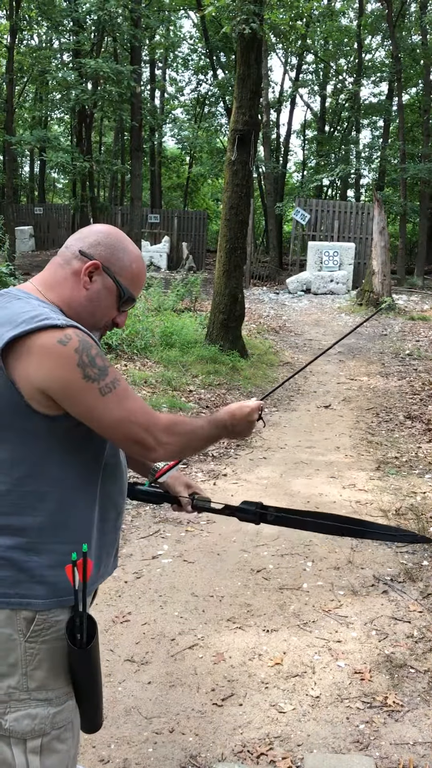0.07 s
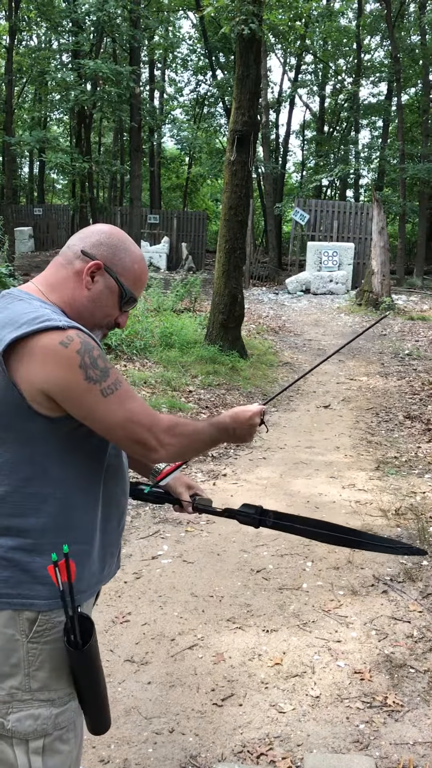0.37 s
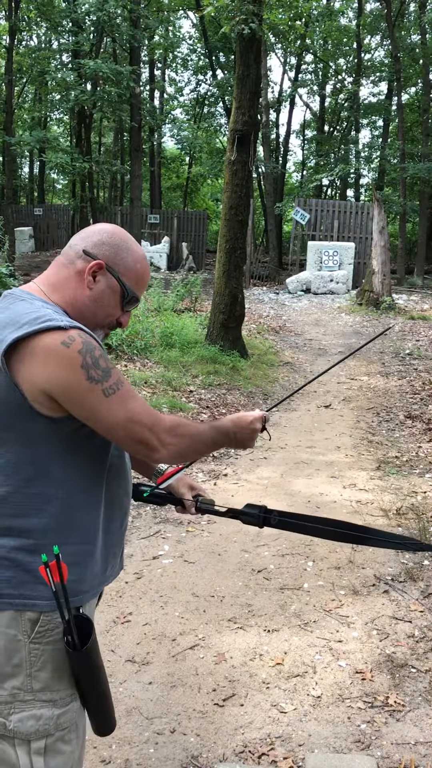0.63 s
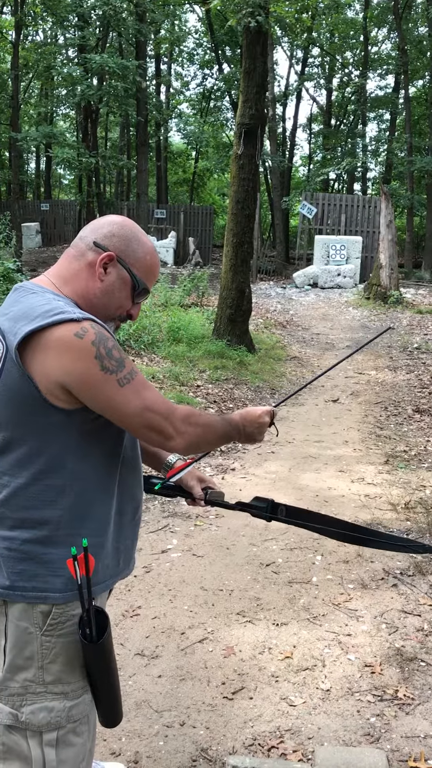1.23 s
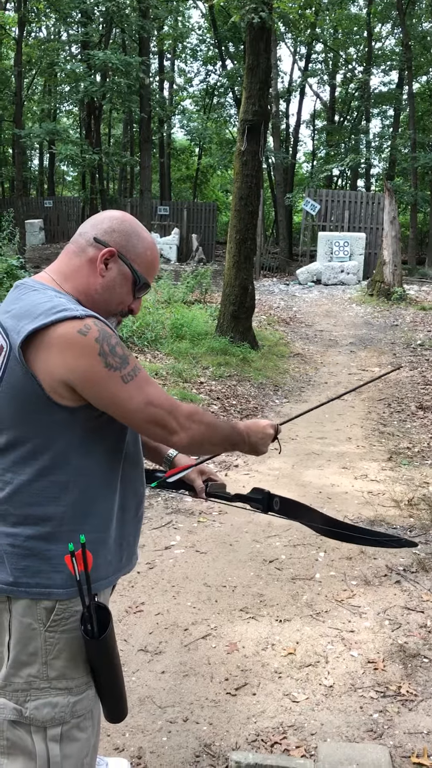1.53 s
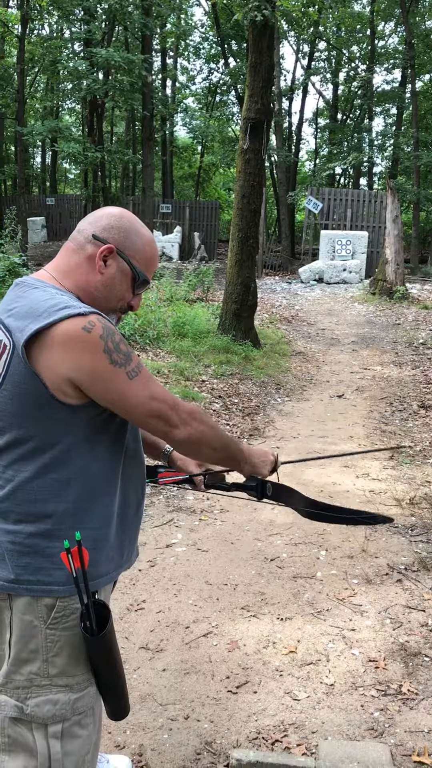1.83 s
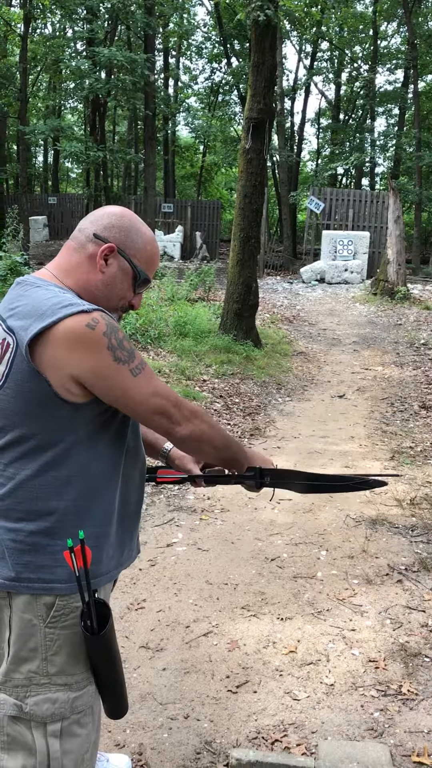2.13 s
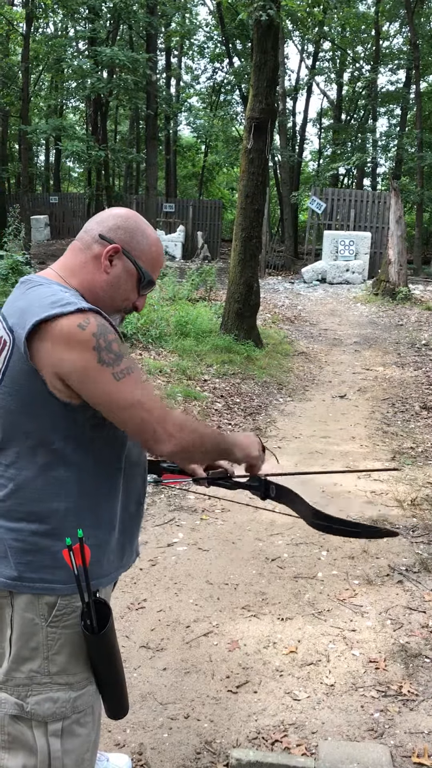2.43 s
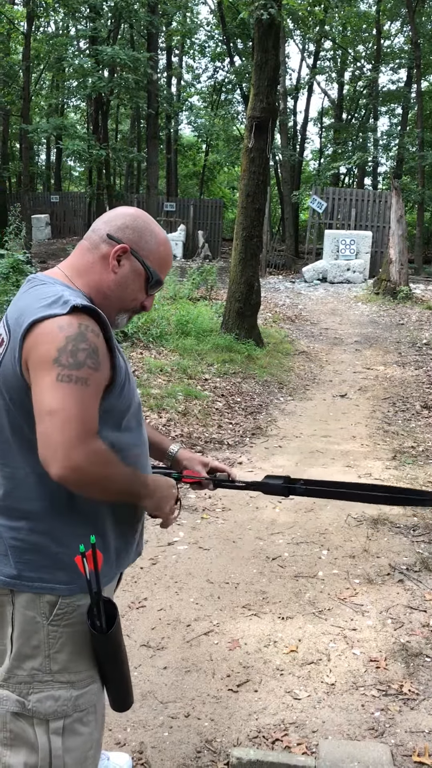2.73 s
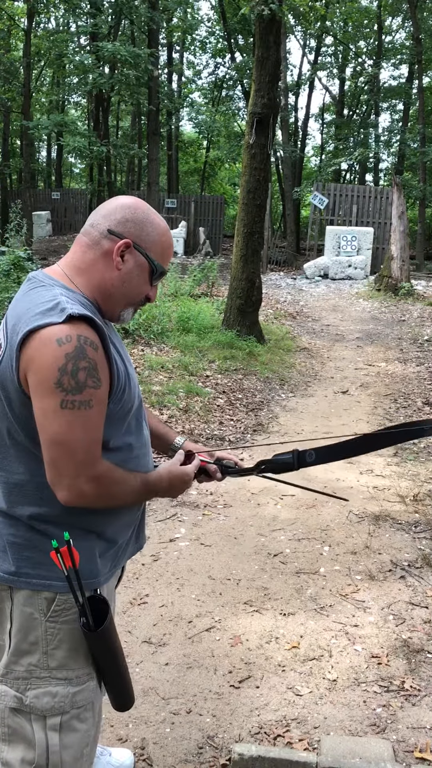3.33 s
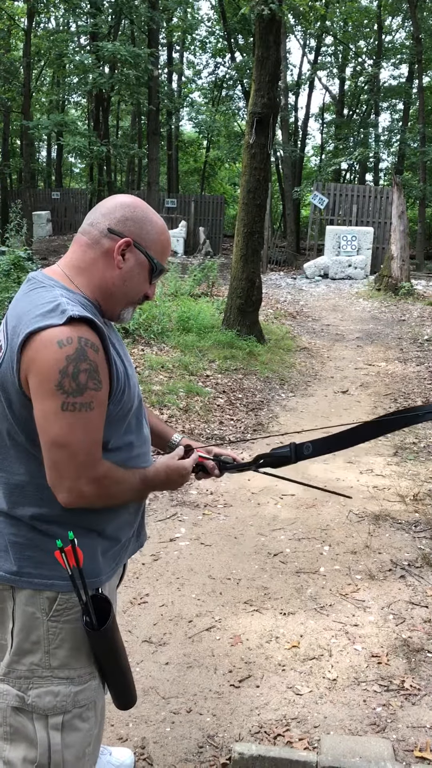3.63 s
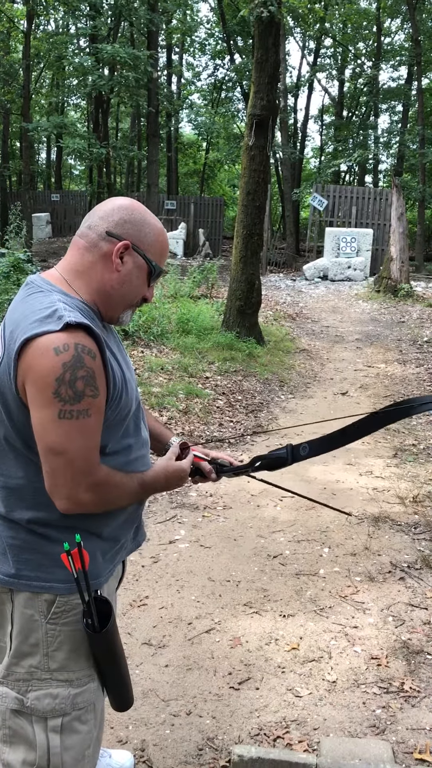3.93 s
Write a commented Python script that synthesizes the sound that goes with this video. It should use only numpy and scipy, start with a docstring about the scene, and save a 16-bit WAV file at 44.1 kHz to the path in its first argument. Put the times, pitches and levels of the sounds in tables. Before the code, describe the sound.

A close arrow shaft strikes a bow with one sharp, briefly ringing clack about halfway through, followed by small ticks and muffled bumps. Faint bird chips, insects and a low, far engine drone fill the quiet woods.

```python
"""An arrow is laid on a bow close to the microphone, in a wood: the shaft slides, clacks against
the rest, rings briefly and ticks along it. Farther off, small birds chip and the trunks echo them.
One nearby insect pulses its wings over a distant chorus and a cricket. Two far engines drone
and beat against each other, in a wash of traffic and leaves."""
import sys
import numpy as np
from scipy import signal
from scipy.fft import rfft, irfft
from scipy.io import wavfile

SR = 44100
rng = np.random.default_rng(int(sys.argv[2]) if len(sys.argv) > 2 else 0)


def put_to_file(sound):
    """Save the sound as 16-bit audio at rate SR, in the file named by the first command-line argument."""
    columns = np.atleast_2d(sound).T  # one column per channel
    safe = np.clip(columns, -1, 1)
    whole_steps = np.round(safe * 32767)
    wavfile.write(sys.argv[1], SR, whole_steps.astype(np.int16))


N = 176400
T = np.arange(N) / SR


def amp(db):
    """Decibels to gain."""
    return 10 ** (np.asarray(db) / 20)


def unit_rms(x):
    """Scales to rms 1."""
    return x / np.sqrt(np.mean(x ** 2) + 1e-20)


def curve(rows, column=1):
    """One column of a time table at every sample."""
    rows = np.array(rows)
    return np.interp(T, rows[:, 0], rows[:, column])


def add(mix, start, sound):
    """Mixes a sound in at a start in seconds."""
    part = mix[max(round(start * SR), 0):][:len(sound)]
    part += sound[:len(part)]


def noise(shape):
    """Noise of rms 1 whose spectrum is shape(Hz)."""
    hz = np.fft.rfftfreq(N, 1 / SR) + 1
    return unit_rms(irfft(rfft(rng.standard_normal(N)) * shape(hz), N))


def coloured(points):
    """Noise with a spectrum of (Hz, relative dB) points."""
    hz, db = np.transpose(points)
    return noise(lambda f: amp(np.interp(np.log(f), np.log(hz), db)))


def band(hz, width):
    """Noise in a bell around one frequency."""
    return noise(lambda f: np.exp(-.5 * ((f - hz) / width) ** 2))


# The far wash and its rumble. Each row: frequency in Hz, relative level in dB.
AIR_SPECTRUM = [(120, -38), (200, -6), (300, -2), (440, -8), (640, -4), (950, -2), (1400, -8),
                (2000, -14.5), (3000, -23.5), (4000, -29), (5300, -31.5), (6500, -36), (9000, -40),
                (11500, -44), (15700, -43.5)]
RUMBLE_SPECTRUM = [(15, -33), (28, -14), (38, -1), (55, 2.5), (70, 3), (110, -4), (135, -12), (190, -12.5),
                   (260, -38), (500, -58.5)]
# The wash's swell and a soft treble among the trees. Each row: time in seconds, gain in dB.
AIR_SWELL = [(0, -0.3), (1, -0.5), (1.8, 0.64), (2.8, 1), (3.3, -0.5), (4, -0.8)]
TREBLE_LEVEL = [(0, -71.5), (.6, -78), (.9, -70.5), (1.3, -73.5), (1.9, -71.5), (2.3, -66.5), (2.8, -68.5),
                (3.1, -71), (3.6, -74), (4, -86)]


def traffic_and_leaves():
    """Distant traffic and leaves blur into a slowly swelling wash."""
    air = amp(-51.5 + curve(AIR_SWELL)) * coloured(AIR_SPECTRUM)
    rumble = amp(-42) * coloured(RUMBLE_SPECTRUM)
    treble = amp(curve(TREBLE_LEVEL)) * band(3110, width=950)
    return air + rumble + treble


# The nearer engine. Each row: time in seconds, firing rate in Hz, level in dB.
NEARER_ENGINE = [(0, 74.16, -34), (1.0, 74.4, -37), (1.5, 74.92, -34.5), (1.9, 74.75, -36.5),
                 (2.4, 75.28, -31), (2.9, 77.38, -30), (3.25, 76.5, -36), (3.55, 77.4, -31),
                 (4, 78.94, -37.5)]
# The farther engine. Each row: time in seconds, level in dB.
FARTHER_ENGINE = [(0, -53), (.6, -40.5), (1.1, -35), (1.6, -38), (2.1, -56), (2.4, -85), (4, -47.5)]
# Harmonics of both. Each row: multiple of the firing rate, relative level in dB.
HARMONICS = [(1, 1), (2, -23), (3, -30)]


def engines(farther_hz=80.25, whine_hz=551.9, waver_db=0.98):
    """Two far drones a few hertz apart beat; a thin whine wavers above them."""
    def drone(cycles):
        return sum(amp(db) * np.sin(2 * np.pi * k * cycles) for k, db in HARMONICS)

    nearer_db = curve(NEARER_ENGINE, column=2) + waver_db * band(4, width=5)
    nearer = amp(nearer_db) * drone(np.cumsum(curve(NEARER_ENGINE)) / SR)
    farther = amp(curve(FARTHER_ENGINE)) * drone(farther_hz * T)
    whine = amp(-62) * np.sin(2 * np.pi * whine_hz * T) + amp(-65) * band(whine_hz, width=6.1)
    return nearer - farther + whine


# Insects deep in the wood. Each row: frequency in Hz, relative level in dB.
CHORUS_SPECTRUM = [(6000, -30), (6800, -11), (7100, 0), (7500, -1.5), (7900, 0), (8300, -0.5), (8600, -34),
                   (9500, -45)]
# Their steady trills. Each row: centre in Hz, width in Hz, level in dB.
TRILLS = [(7355, 27, -80.5), (10230, 84, -90)]
# A far cricket. Each row: time in seconds, pitch in Hz, level in dB.
CRICKET = [(0, 2550, -72), (.45, 2560, -73.5), (.7, 2567, -73.5), (1.7, 2580, -73), (2.05, 2626, -67.5),
           (2.7, 2614, -73), (3.2, 2647, -76), (4, 2670, -76)]


def far_insects():
    """Many insects merge into a hiss, with thin trills and a cricket's fluttering tone."""
    trills = sum(amp(db) * band(hz, width) for hz, width, db in TRILLS)
    tone = np.sin(2 * np.pi * np.cumsum(curve(CRICKET)) / SR)
    cricket = amp(curve(CRICKET, column=2)) * unit_rms(band(0, width=48) * tone)
    return trills + cricket + amp(-73.5) * coloured(CHORUS_SPECTRUM)


# One cycle of wing strokes. Each row: first peak in seconds, half-width in seconds, level in dB.
WING_STROKES = [(0.098, 0.0051, -66.5), (.124, 0.015, -73.5), (0.165, .011, -74.5)]
# The wing's resonances. Each row: centre in Hz, width in Hz, relative level in dB.
WING_BANDS = [(8077, 25, 2), (8070, 120, -4), (8380, 26, -8)]


def near_insect(cycles_per_s=8.56):
    """An insect near the microphone repeats one strong and two weak wing strokes."""
    period, strokes = 1 / cycles_per_s, np.zeros(N)
    for peak, half_width, db in WING_STROKES:
        from_peak = (T - peak + period / 2) % period - period / 2
        strokes += amp(db) * np.exp(-.5 * (from_peak / half_width) ** 2)
    wing = signal.hilbert(sum(amp(db) * band(hz, width) for hz, width, db in WING_BANDS))
    return strokes * unit_rms(wing.real / np.sqrt(abs(wing) + 1e-9))  # evens out the cycles


# Birds in the trees. Each row: start and length in seconds, level in dB, first and last pitch in Hz.
CHIPS = [(0.558, 0.033, -67.5, 4450, 4770), (0.576, 0.027, -67, 4840, 5050),
         (0.592, 0.011, -66, 4900, 3700), (.697, .06, -71, 4140, 4180), (.80, 0.062, -75, 4320, 4120),
         (2.296, .036, -64, 4750, 3480), (2.405, .038, -66, 4500, 3280), (2.504, 0.039, -62.5, 4300, 3160),
         (2.619, 0.023, -60, 4350, 3340), (3.771, .045, -71, 3200, 4570), (3.877, 0.014, -64, 2800, 3550),
         (3.955, 0.033, -70, 3100, 4140)]


def birds(wobble=0.015):
    """Small birds whistle short, slightly unsteady glides."""
    out = np.zeros(N)
    for start, length, db, first_hz, last_hz in CHIPS:
        u = np.arange(0, length, 1 / SR) / length
        hz = first_hz * (last_hz / first_hz) ** u * (1 + wobble * band(120, width=150)[:len(u)])
        envelope = amp(db) * np.sqrt(2 * abs(np.sin(np.pi * u)))
        add(out, start, envelope * np.sin(2 * np.pi * np.cumsum(hz) / SR))
    return out


def trunk_echo(x, t60=.9, onset_s=0.013):
    """The trunks scatter sound back to the microphone as a diffuse tail."""
    t = T[:SR]
    tail = rng.standard_normal(SR) * amp(-60 * t / t60) * np.minimum(t / onset_s, 1)
    return signal.fftconvolve(x, tail / np.linalg.norm(tail))[:N]


def swish(length, db, hz, octaves):
    """A puff of friction noise that swells quickly and fades."""
    u = np.arange(0, length, 1 / SR) / length
    friction = noise(lambda f: np.exp(-.5 * (np.log2(f / hz) / octaves) ** 2))
    return amp(db) * np.interp(u, [0, 0.38, 1], [0, 1, 0]) * friction[:len(u)]


# Close rustles. Each row: start and length in seconds, level in dB, centre in Hz, width in octaves.
SLIDES = [(0, .2, -77, 14000, .4), (0.234, 0.16, -76, 5370, .15), (.86, .2, -77, 5400, .12),
          (1.482, .13, -71.5, 10400, .03), (1.511, 0.17, -67.5, 7400, 0.33),
          (1.526, 0.18, -64.5, 5100, 0.41), (2.388, 0.079, -71.5, 12000, .5),
          (2.503, 0.48, -73.5, 5360, 0.34), (2.74, 0.054, -67, 14500, .2), (3.416, 0.15, -72.5, 5970, 0.68),
          (3.581, 0.13, -73, 6000, .3)]
# Low handling bumps. Each row: start and length in seconds, level in dB, centre in Hz.
BUMPS = [(1.86, 0.11, -49, 145), (2.505, 0.093, -35, 112), (2.58, 0.15, -44, 121), (2.73, 0.19, -37, 108.4)]


def handling():
    """Shaft, fingers and clothes rub and bump softly beside the microphone."""
    out = np.zeros(N)
    for start, *slide in SLIDES:
        add(out, start, swish(*slide))
    for start, *bump in BUMPS:
        add(out, start, swish(*bump, octaves=0.36))
    return out


# The arrow settling on the rest. Each row: start in seconds, level in dB, decay in seconds.
TICKS = [(1.8835, -59, .002), (1.9132, -57, 0.0011), (1.9178, -51, .0007), (1.9432, -57, .001),
         (2.025, -57, 0.0028), (2.0615, -56, .002), (2.091, -58, .002), (2.111, -55, .002),
         (2.1977, -53.5, .0014), (2.2211, -53, .0015), (2.233, -55.5, 0.0026), (2.734, -59, 0.0062),
         (2.76, -63, .005)]
# A tick's colour. Each row: frequency in Hz, relative level in dB.
TICK_SPECTRUM = [(1000, -17), (3000, -9), (6000, 3), (8800, 2.5), (10500, -5.5), (13500, 2), (15000, -5),
                 (16000, -11)]


def arrow_ticks():
    """Light contacts give small dry bursts of noise as the arrow is seated."""
    out, t = np.zeros(N), T[:SR // 5]
    for start, db, decay in TICKS:
        add(out, start, amp(db) * coloured(TICK_SPECTRUM)[:len(t)] * np.exp(-t / decay))
    return out


# Shaft on bow. Each row: start in seconds, ring in dB, tilt in dB per octave, crack in dB.
KNOCKS = [(1.9124, -31.5, 4.5, -30.5), (1.9144, -38, 0, -33), (1.9203, -43, 0, -47), (2.0255, -52, 5, -60),
          (2.2318, -56, 5, -64), (2.7345, -48.5, 2, -63), (2.766, -54, -1, -68)]
# The shaft's modes. Each row: frequency in Hz, relative level in dB, seconds to fall 60 dB.
SHAFT_MODES = [(795, -22, .08), (1080, -11, .08), (1346, -13, 0.058), (2453, -9.5, 0.081), (2870, -9, 0.03),
               (2950, -9, 0.054), (3320, -19.5, .028), (3521, -7.5, 0.052), (3830, -12.5, 0.041),
               (4260, -16, 0.048), (4550, -14.5, 0.029), (4800, -25, 0.016), (5260, -17, 0.026),
               (5850, -16, .02), (6350, -19.5, 0.022), (6950, -21, 0.016), (7650, -23, 0.016)]
# The crack of contact. Each row: frequency in Hz, relative level in dB.
CRACK_SPECTRUM = [(500, -16), (1300, -19), (2100, -20), (3000, 19), (5000, -5), (8000, -1), (10000, -26),
                  (14000, -23), (16000, -28)]


def arrow_knocks(attack_s=0.00018, crack_decay_s=0.00083):
    """Close up, the shaft strikes the bow with a crack and rings in its modes."""
    out, t = np.zeros(N), T[:SR // 5]
    for start, ring_db, tilt, crack_db in KNOCKS:
        ring = np.zeros(len(t))
        for hz, db, t60 in SHAFT_MODES:
            envelope = amp(ring_db + db + tilt * np.log2(hz / 3500) - 60 * t / t60)
            ring += envelope * np.sin(2 * np.pi * (hz * t + rng.random()))
        crack = amp(crack_db) * coloured(CRACK_SPECTRUM)[:len(t)] * np.exp(-t / crack_decay_s)
        add(out, start, (ring + crack) * np.minimum(t / attack_s, 1))
    return out


def scene():
    """One microphone in the wood: the arrow close and almost dry, the birds echoing beyond it."""
    arrow = arrow_knocks() + arrow_ticks() + handling()
    song = birds()
    wash = traffic_and_leaves()
    echo = trunk_echo(amp(-38) * arrow + song)
    return (arrow + song + echo + wash + engines() + near_insect() + far_insects())[None]


def record(dry):
    """The recorder cuts the treble above 15830 Hz."""
    lowpass = signal.firwin(801, 15830, window=("kaiser", 9), fs=SR)
    return signal.oaconvolve(dry, lowpass[None], "same")


dry = scene()
out = record(dry)
put_to_file(out)
```